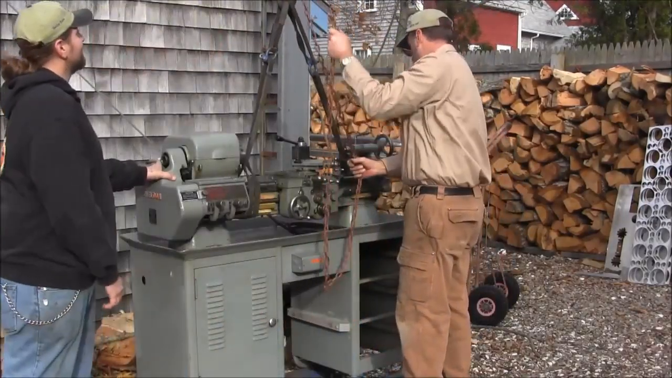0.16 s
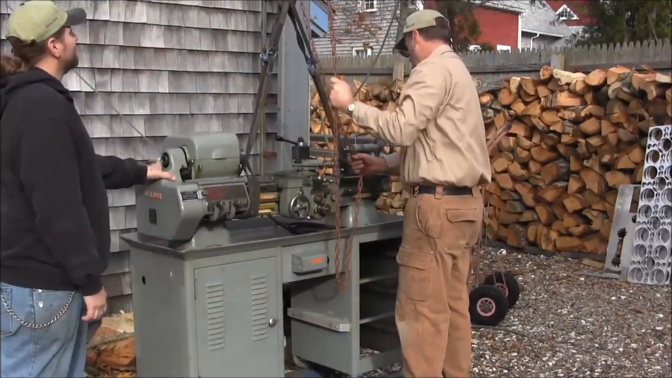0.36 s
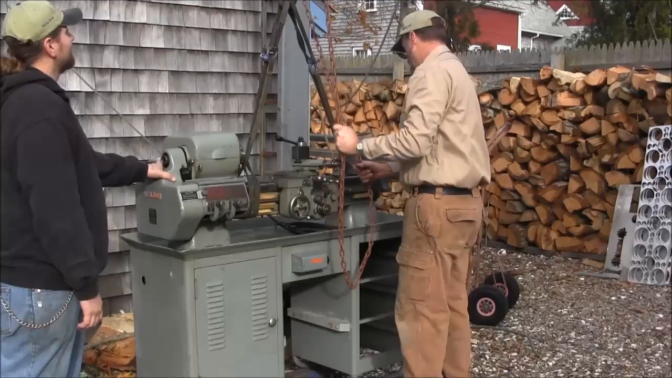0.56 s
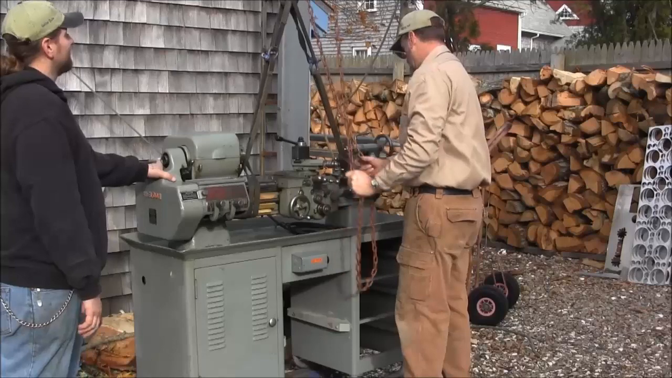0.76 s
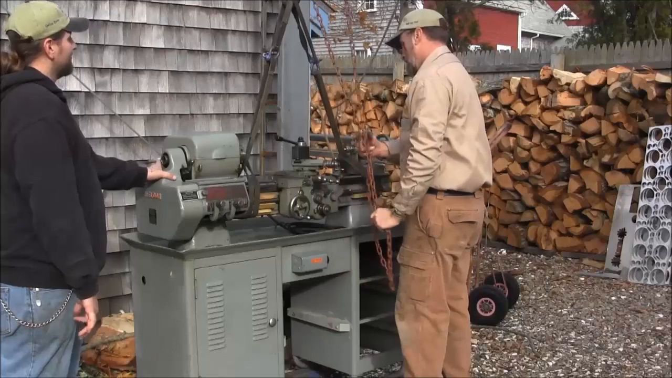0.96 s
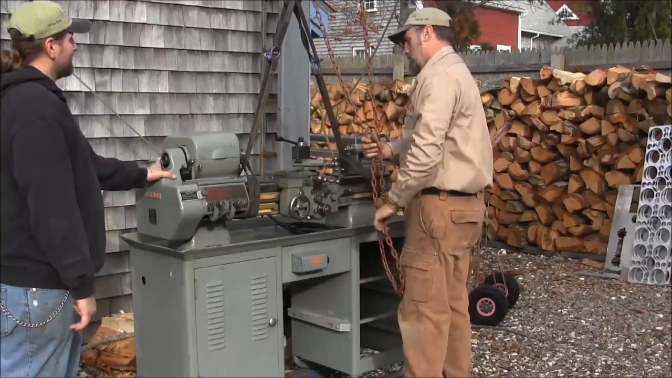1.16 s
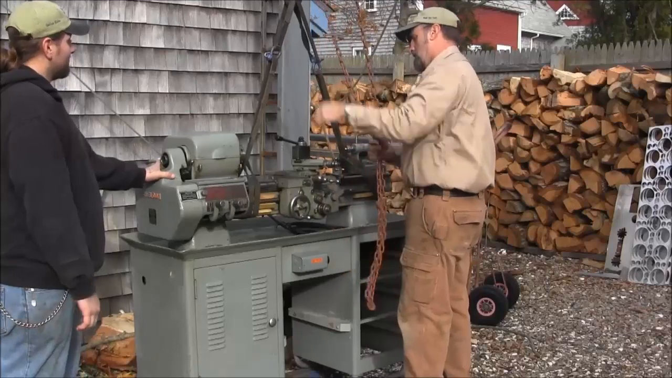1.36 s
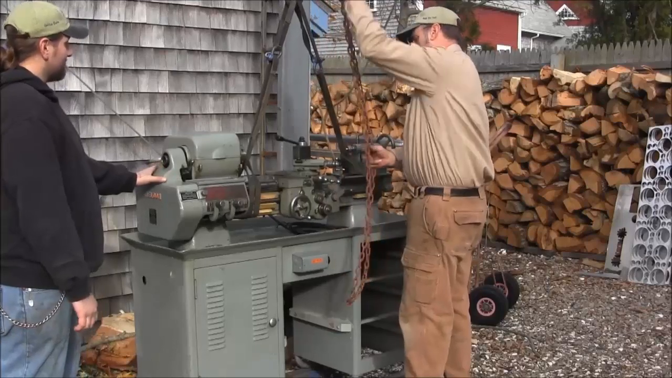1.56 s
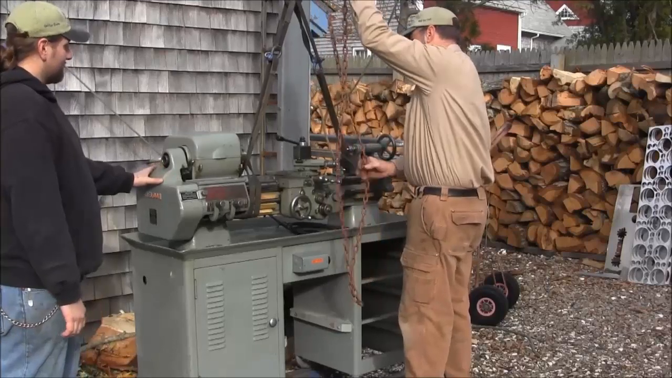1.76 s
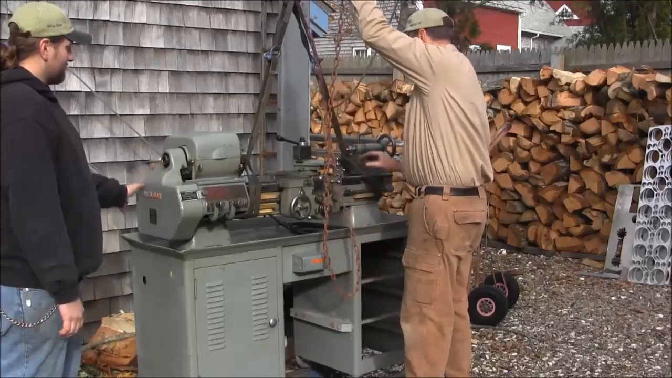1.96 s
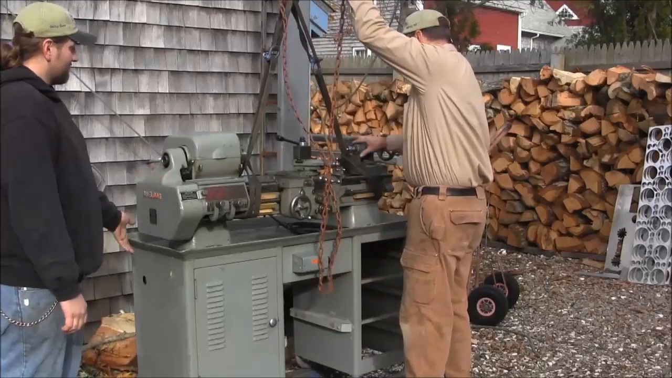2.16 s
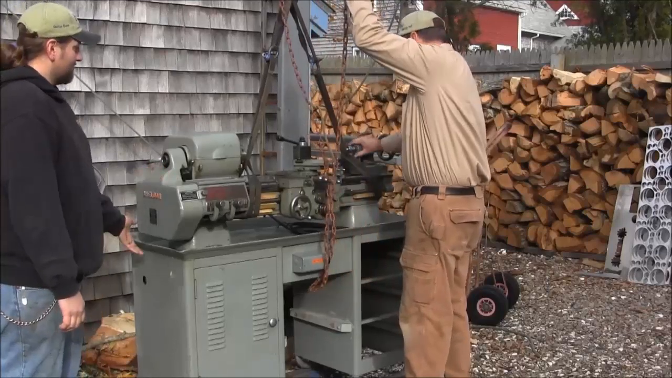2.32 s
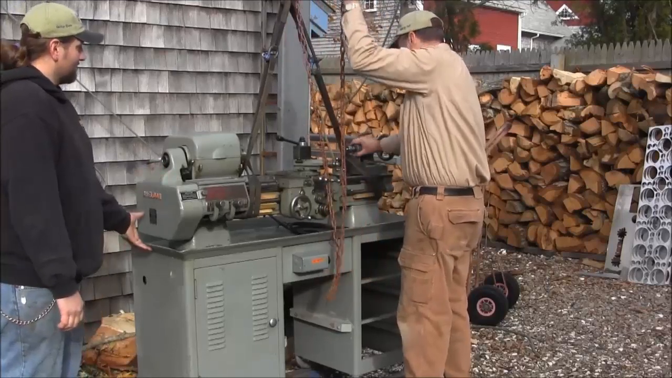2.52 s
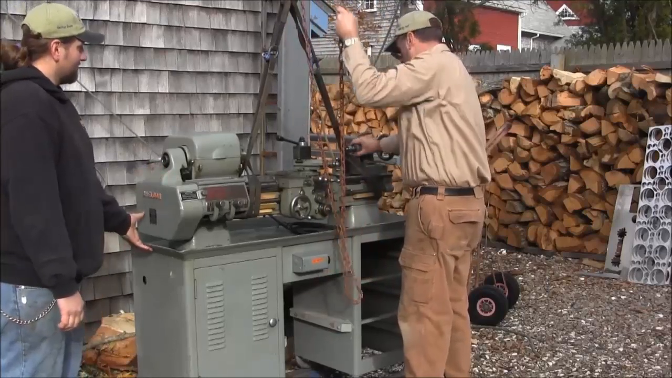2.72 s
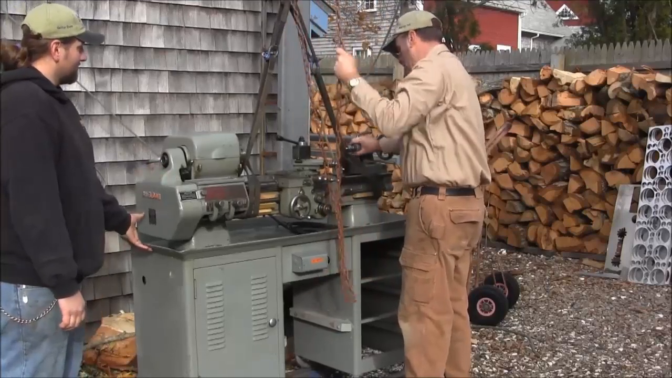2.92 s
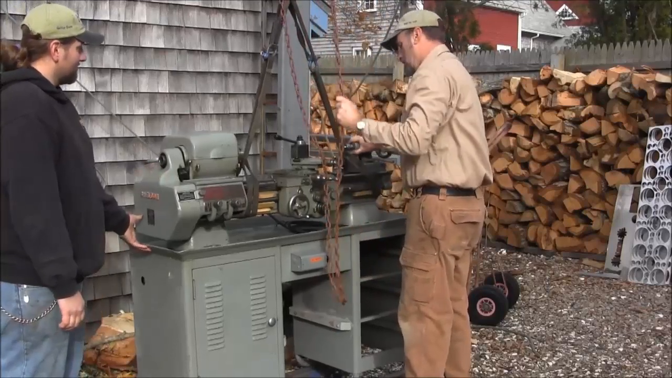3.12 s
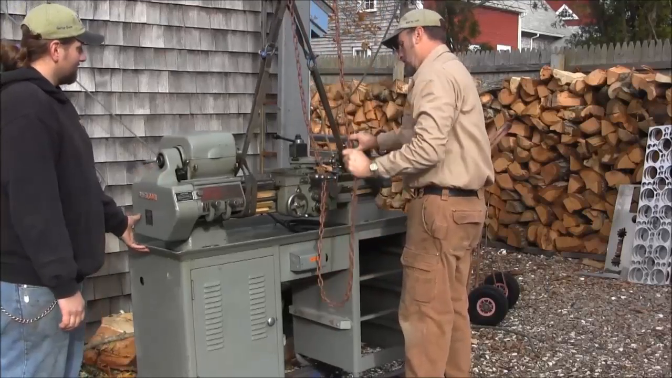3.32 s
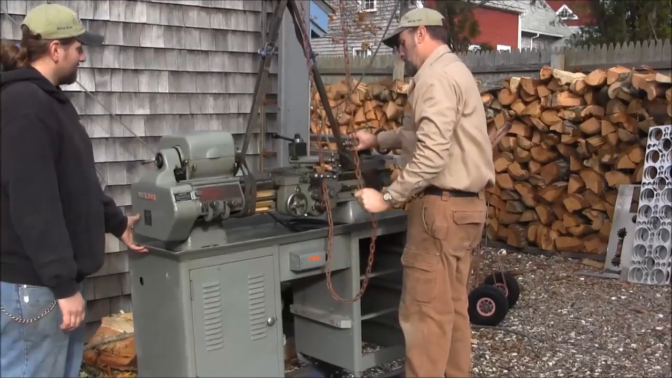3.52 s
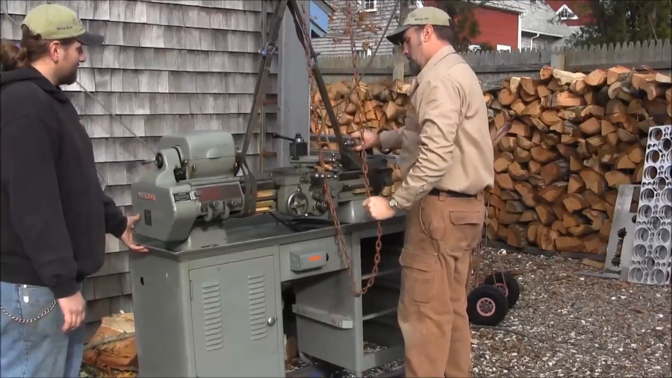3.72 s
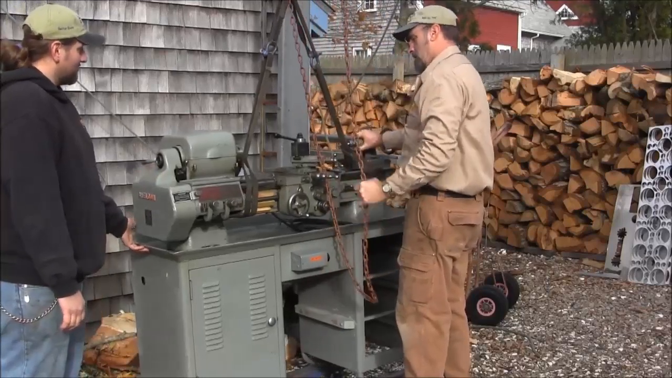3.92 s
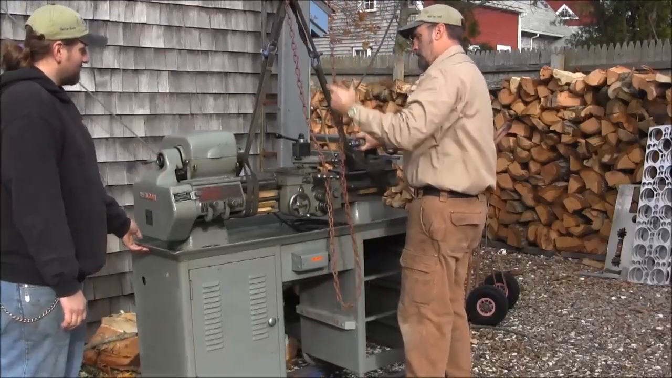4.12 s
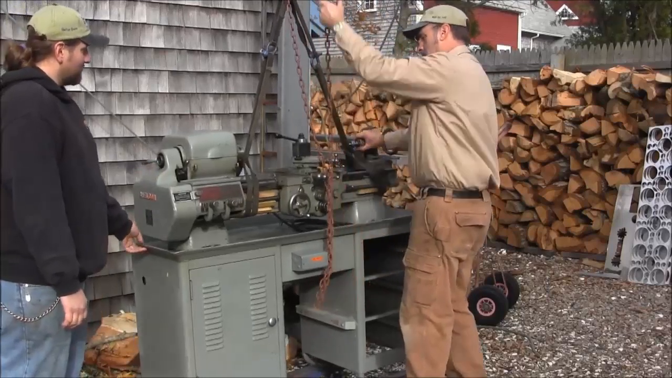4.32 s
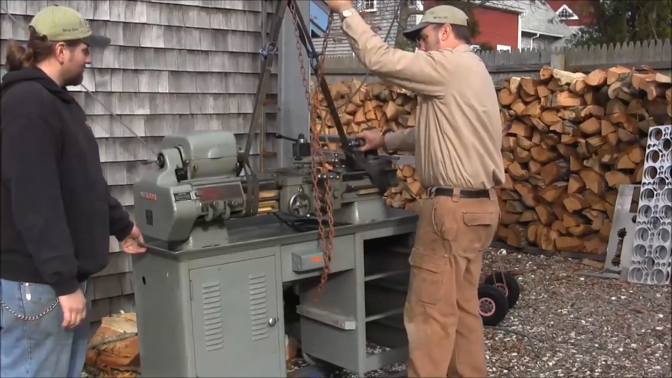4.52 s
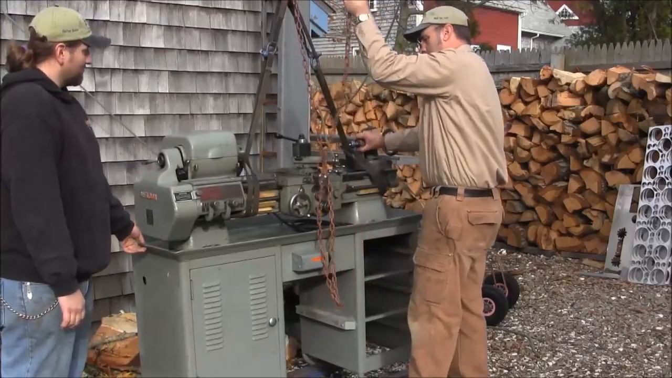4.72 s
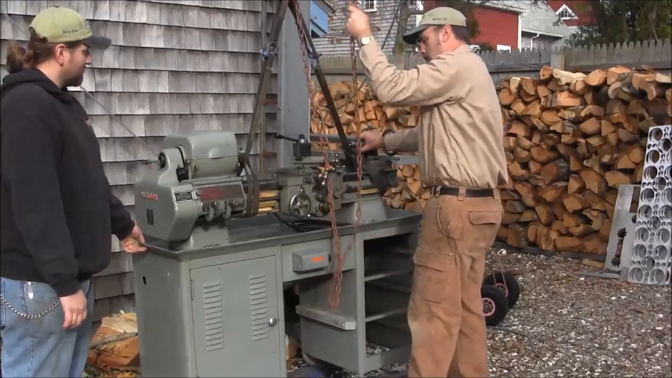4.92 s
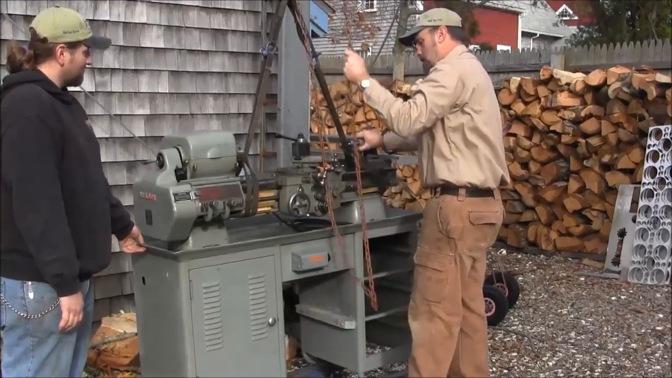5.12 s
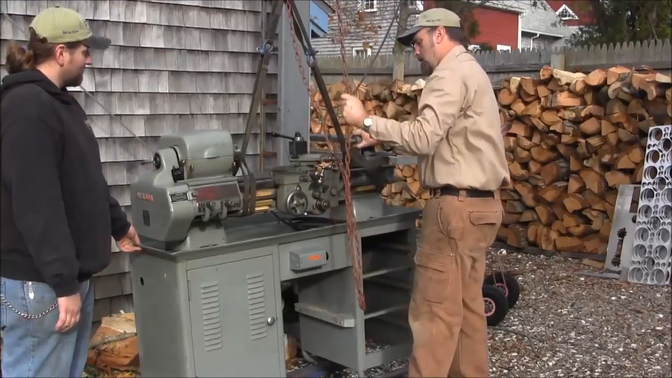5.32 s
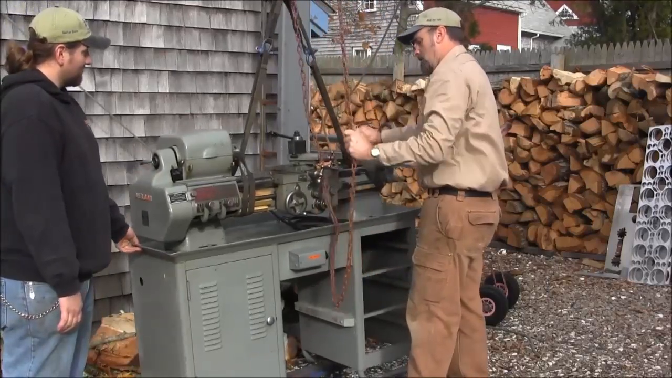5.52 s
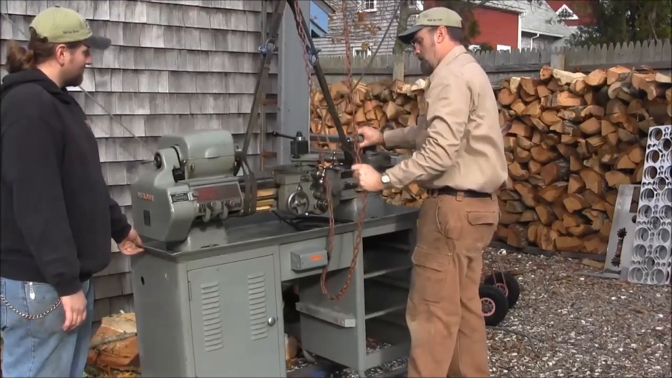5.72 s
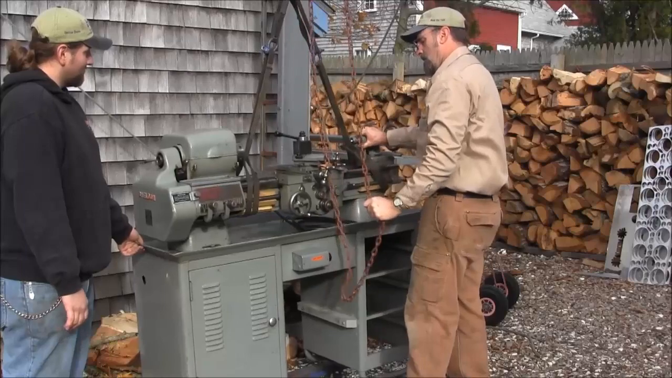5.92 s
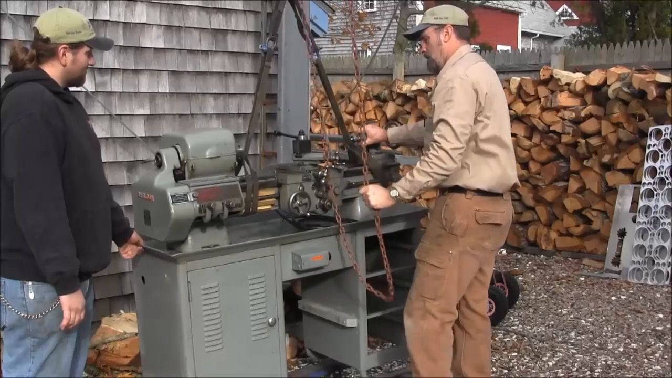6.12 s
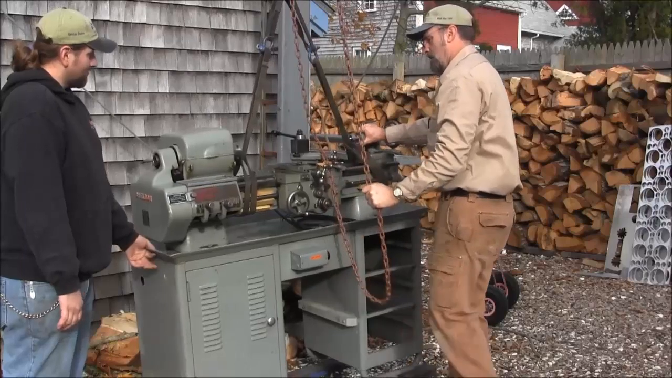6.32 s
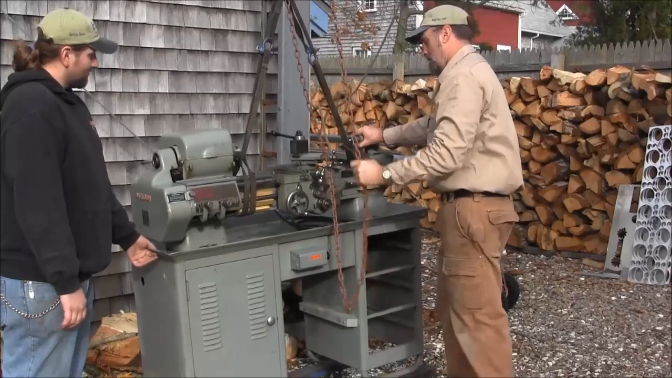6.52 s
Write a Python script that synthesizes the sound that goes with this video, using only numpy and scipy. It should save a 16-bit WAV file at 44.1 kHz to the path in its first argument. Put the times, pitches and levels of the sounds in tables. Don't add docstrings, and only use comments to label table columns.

```python
import sys
import numpy as np
from scipy import signal
from scipy.fft import rfft, irfft, next_fast_len
from scipy.io import wavfile
from scipy.ndimage import uniform_filter1d, map_coordinates

SR = 44100
rng = np.random.default_rng(int(sys.argv[2]) if len(sys.argv) > 2 else 0)


def transcribe(u):
    v = np.clip(np.atleast_2d(u).T, -1, 1)
    q = np.round(v * 32767).astype(np.int16)
    wavfile.write(sys.argv[1], SR, q)


def undo_db(level):
    steps = np.asarray(level, float) / 20
    return 10 ** steps


N = 294147
BLOW = 6144

# pitch_hz, level_db (per Hz)
ROAD_TONE = [(15, -66), (25, -1), (58, -15), (80, 1.5), (256, -1.5), (363, -1), (394, 3.5), (451, -1.5),
             (754, 0.5), (1440, -2.5), (2050, -12), (14800, -43), (16000, -48)]
# pitch_hz, likeness (1 = the same)
ROAD_LIKENESS = [(30, 0.93), (70, .85), (130, 0.96), (240, 0.91), (950, 0.88), (3770, 0.78), (15000, 0.65)]
# pitch_hz, fade_s (to fall 60 dB)
WALL_FADE = [(200, 0.18), (2000, 0.032), (10000, 0.2)]

# start_s, clack_db, ring_db
PULL_1 = [(0.0094, -6, -44), (0.0537, -4.5, -24), (0.0898, -4, -25), (0.1246, -5, -34), (0.1579, -6.5, -30),
          (0.1917, -8, -23), (0.2263, -7.5, -33), (0.2599, -6.5, -23.5), (0.2939, -11, -22),
          (0.325, -9.5, -33), (0.3583, -9.5, -27), (0.392, -8, -30), (0.4248, -12.5, -28),
          (0.4577, -9.5, -31), (0.4918, -13, -32), (0.5258, -10, -28), (0.5618, -9.5, -24.5),
          (0.5983, -11.5, -34), (0.635, -8.5, -29.5), (0.6721, -9.5, -29), (0.7073, -9, -29),
          (0.7455, -8, -28.5), (0.7807, -10, -22), (0.8151, -9.5, -25), (0.8477, -8.5, -32),
          (0.8804, -8, -35), (0.9156, -6.5, -28), (0.9493, -9.5, -28), (0.9869, -8, -28),
          (1.0287, -8, -32.5), (1.087, -10.5, -32)]
PULL_2 = [(2.6038, -13, -26), (2.6569, -10, -29.5), (2.706, -12.5, -28.5), (2.7523, -10.5, -37),
          (2.796, -15, -31), (2.839, -11, -31), (2.878, -9, -25), (2.9175, -10.5, -27), (2.958, -10, -30),
          (2.9991, -20, -32), (3.035, -11.5, -27), (3.073, -24, -33), (3.1095, -9.5, -33),
          (3.146, -8.5, -28), (3.18, -7.5, -30), (3.2128, -13, -21.5), (3.246, -8, -32),
          (3.2763, -8.5, -25), (3.3083, -9.5, -34), (3.3406, -14, -23), (3.3717, -12, -28),
          (3.4038, -13, -28.5), (3.4384, -12.5, -26.5), (3.474, -9, -27.5), (3.5091, -7, -30),
          (3.5473, -10.5, -34), (3.588, -12, -28), (3.6359, -14, -23), (3.6927, -20.5, -28.5)]
PULL_3 = [(4.8642, -11, -29), (4.9536, -10.5, -21.5), (5.007, -8.5, -29), (5.0528, -9.5, -27.5),
          (5.0928, -18, -35), (5.1342, -16.5, -36), (5.17, -21, -29), (5.2038, -11.5, -35),
          (5.241, -13.5, -23.5), (5.276, -12, -26), (5.3131, -10.5, -32), (5.3492, -13.5, -29.5),
          (5.3878, -11, -31), (5.431, -13, -31), (5.4787, -12.5, -28), (5.5274, -13, -29),
          (5.5753, -11, -30), (5.6222, -11.5, -29.5), (5.669, -8, -47), (5.717, -9.5, -33),
          (5.77, -12, -26.5), (5.8201, -11.5, -32), (5.8681, -10.5, -29.5), (5.9112, -11.5, -28.5),
          (5.9536, -13.5, -38), (5.995, -19, -32)]

# pitch_hz, width_hz, level_db
HOUSING = [(600, 250, -2), (1450, 120, 9.5), (1088, 56, 3), (1300, 300, 11.5), (2330, 520, 3),
           (2340, 20, 14), (2850, 48, 6), (3390, 290, 1.5), (3470, 150, 6), (4025, 280, 5.5), (4540, 94, 2),
           (4930, 71, 6.5), (5020, 40, -1), (5670, 84, 0.5)]
COVER = [(2295, 30, -2), (2350, 22, 0), (2410, 30, -2), (4100, 90, 0), (4880, 45, -3), (5040, 45, -5)]
PAWL = [(8300, 31, 7), (8586, 110, 4.5), (8745, 102, 12.5), (9900, 150, -25)]
SPINDLE = [(12600, 110, 1), (13100, 58, 3), (13000, 64, -4)]
TOOTH = [(4070, 1190, -10), (2440, 550, -9)]
PANEL = [(676, 42, 5), (856, 9.7, 7.5), (963, 110, 3), (1300, 160, 1.5), (1484, 130, 1.5), (1596, 16, 4.5),
         (1752, 24, 4), (1910, 12, 10), (2110, 140, -0.5), (2370, 280, 3), (2650, 410, -5.5), (2860, 16, 3),
         (1140, 6.5, -7), (560, 290, -1)]
PANEL_HIGH = [(3450, 1600, -21)]
BOX = [(38.7, 5, -4), (184, 27, -6), (263, 140, -13), (310.3, 12.7, 9), (461.3, 15.6, 5.5)]
LINKS = [(3300, 45, 4), (3600, 570, 47.5), (4300, 1900, -29), (4680, 790, 44), (4750, 170, -4.5),
         (6300, 170, -6), (6750, 600, -107), (9130, 350, -9.5), (12300, 610, -24)]
LOOP = [(1884, 17, -5.5), (2790, 53, 17), (3370, 21, -4.5), (3860, 35, 4), (4790, 16, -13),
        (8350, 100, -28)]

# time_s, level_db
RUBBING = [(0, -23), (.95, -35.5), (1.09, -35.5), (1.9, -77), (1.99, -34), (2.5, -28), (3.05, -21),
           (3.45, -21), (3.62, -22.5), (3.75, -31.5), (4.32, -67), (4.85, -36), (5.1, -27.5), (5.5, -32),
           (5.75, -22.5), (5.93, -18.5), (6.04, -35.5), (6.67, -44)]
# middle_s, box_db, hum_db (one low, narrow note), length_s (to each side)
SHUDDERS = [
    (0.375, -31.5, -58, 0.031),
    (1.413, -51, -47.5, 0.2),
    (1.615, -48, -42.5, 0.14),
    (3.046, -51, -49, 0.54),
    (3.362, -63, -34, 0.056),
    (3.743, -54, -66, 0.44),
    (4.652, -52.5, -63, 0.33),
    (5.194, -36, -45, 0.13),
    (5.773, -49, -31, 0.074),
    (6.227, -45, -59, 0.1),
]
# start_s, level_db, pitch_hz
STRIKES = [(0.0162, -1, 2620), (0.2626, -12, 2020), (0.525, -22, 2540), (0.7468, -3, 4390),
           (0.8561, -12, 2070), (0.8886, -13, 4870), (0.9512, -5, 2630), (0.9943, -7, 3880),
           (1.34, -20, 5730), (1.3802, -21, 5810), (1.4025, -19, 5600), (1.8604, -23, 2330),
           (2.0674, -27, 3830), (2.1173, -8, 1940), (2.1239, -13, 2760), (2.1451, -7, 3320),
           (2.5394, -14, 1640), (2.693, -24, 2710), (2.7485, -17, 5380), (2.7654, -12, 1850),
           (2.8457, -13, 1680), (2.918, -12, 3660), (3.1303, -11, 1980), (3.5173, -7, 1770),
           (3.6927, -14, 4480), (3.7176, -16, 2450), (4.272, -14, 4050), (4.509, -18, 1640),
           (5.0278, -11, 1550), (5.0577, -5, 3270), (5.0939, 0.5, 4010), (5.1547, -15, 4050),
           (5.162, -8, 1510), (5.171, -12, 1510), (5.279, -8, 3660), (5.5955, -11, 4260),
           (5.623, -17, 2070), (5.729, -11, 5250), (5.9, -12, 2200), (6.1706, -23, 1680),
           (6.1947, -12, 4260), (6.4865, -24, 1160)]
# start_s, level_db, clatter_s, pitch_hz, bright_db
SLAPS = [(0.308, -0.5, 0.018, 2050, -7), (1.233, -13.5, 0.025, 544, -12), (1.258, -31, 0.027, 2600, -6),
         (1.632, -38, 0.06, 1140, 1), (1.69, -25, 0.061, 1260, -16), (1.805, -16.5, 0.035, 2580, -22),
         (1.964, -19, 0.065, 1240, -2), (1.99, -29.5, 0.033, 1270, 4.5), (2.027, -24, 0.11, 1060, -5),
         (2.065, -20, 0.017, 766, 0), (2.078, -15.5, 0.0063, 1300, -13), (2.111, -0.5, 0.019, 2160, -3.5),
         (2.146, -5.5, 0.027, 2890, -10.5), (2.172, -9, 0.015, 900, -21), (2.205, -10, 0.02, 2440, -8),
         (2.266, -4, 0.032, 1670, -0.5), (2.334, -15.5, 0.016, 1010, -12), (2.365, -24, 0.028, 1500, 1),
         (2.386, -31, 0.036, 1240, -32), (2.441, -13.5, 0.0081, 1840, -39), (2.467, -19, 0.04, 3000, 2),
         (2.539, -6, 0.047, 1770, -9), (2.59, -0.5, 0.021, 2070, -10.5), (2.75, -20, 0.045, 1570, -6),
           (2.763, -1.5, 0.026, 2050, -8.5), (2.872, -6.5, 0.023, 2870, -3.5), (2.938, -3, 0.027, 2110, -1),
           (2.998, -1.5, 0.025, 2650, -8.5), (3.063, -2.5, 0.022, 2650, -8), (3.129, -3.5, 0.028, 1910, -9),
           (2.991, -10, 0.021, 2000, -6), (3.16, -8, 0.03, 1880, -7), (3.188, -6, 0.034, 1500, -13),
           (3.39, -5.5, 0.017, 1770, -20), (3.7, -14.5, 0.026, 2260, -5), (3.218, -3, 0.05, 1910, -10),
           (3.33, -1, 0.055, 1300, -11.5), (3.447, -2, 0.031, 1580, -9), (3.519, 1, 0.016, 1760, -16),
           (3.6, -3, 0.026, 1910, -5), (3.848, -14.5, 0.091, 1110, -14), (4.271, -15, 0.02, 634, -10),
           (4.379, -10.5, 0.021, 755, -10.5), (4.41, -28, 0.093, 1470, -8), (4.487, -18.5, 0.005, 900, -14),
         (4.591, -19.5, 0.028, 1630, -31), (4.512, -21.5, 0.045, 1180, -27),
           (5.154, -10.5, 0.035, 1810, -6), (5.583, -17, 0.032, 1000, 6), (5.626, -19, 0.017, 1420, -3),
           (5.735, -6, 0.056, 1300, -12.5), (5.872, -14, 0.018, 1450, -12), (5.931, -10.5, 0.02, 1500, -11),
           (4.73, -21.5, 0.052, 950, -39), (4.801, -15.5, 0.018, 1500, -14.5),
           (5.028, -2, 0.026, 1940, -6.5), (5.095, -6.5, 0.023, 910, -5), (5.164, -3, 0.017, 1120, -10),
           (5.541, -7.5, 0.034, 1950, 0), (5.595, -6, 0.026, 1940, -6), (5.669, -2.5, 0.075, 1570, -10.5),
           (5.761, -8.5, 0.012, 557, -17), (5.845, -4, 0.033, 1800, -12.5),
           (5.897, -10.5, 0.03, 1910, -10.5), (6.001, -11.5, 0.086, 2080, -11.5),
           (6.136, -24, 0.11, 1720, -8.5), (6.173, -12, 0.057, 1850, -9), (6.196, -5, 0.019, 2790, -18),
           (6.405, -18.5, 0.021, 830, -8)]
# start_s, level_db
THUMPS = [(0.306, -14), (1.235, -22.5), (1.263, -21), (2.205, -23), (2.765, -45), (3.004, -16),
          (3.063, -15), (3.128, -22), (3.329, -44), (3.449, -26), (3.518, -31), (3.843, -22),
          (5.023, -13.5), (5.162, -44), (5.594, -13.5), (5.775, -30), (6.172, -16), (6.198, -20),
          (6.401, -30)]
# start_s, level_db
TICKS = [(1.3124, -37), (1.34, -27.5), (1.352, -29), (1.3794, -27.5), (1.4012, -26), (1.421, -35),
         (1.544, -38), (1.5663, -35), (1.797, -34), (1.358, -41), (1.532, -46), (1.8597, -47), (2.418, -34),
         (2.378, -33), (1.874, -37), (2.0214, -36), (4.258, -32), (4.3305, -32), (4.411, -46), (4.435, -41),
         (4.563, -39), (4.663, -43), (4.941, -29), (5.527, -33), (4.488, -40), (4.515, -40), (4.635, -40),
         (6.169, -31), (4.788, -31), (4.3593, -22), (4.4493, -36), (6.323, -27.5), (6.388, -27),
         (6.488, -44), (6.52, -31), (6.126, -37)]
# start_s, level_db, clatter_s,
# pitch_hz
CLANKS = [(1.628, -32.5, 0.31, 1140), (1.804, -26, 0.022, 2910), (1.964, -25.5, 0.17, 1250),
          (1.976, -27, 0.3, 634), (1.992, -23.5, 0.14, 1260), (2.028, -32, 0.12, 1104),
          (2.174, -25.5, 0.055, 687), (2.333, -30, 0.074, 1010), (2.386, -30.5, 0.042, 1280),
          (2.467, -32, 0.019, 3600), (3.001, -15.5, 0.08, 2650), (3.328, -24, 0.038, 1300),
          (5.028, -19.5, 0.22, 856), (5.163, -22, 0.053, 868), (5.17, -26.5, 0.078, 618),
          (5.54, -15.5, 0.04, 1910), (1.09, -26.5, 0.2, 2350), (1.09, -33, 0.19, 4740),
          (1.09, -28, .07, 13050), (1.632, -48, 0.092, 8100), (1.695, -50, 0.11, 8100),
          (1.258, -58, .04, 7200), (1.811, -50, 0.045, 4740), (1.812, -39, .12, 3030),
          (2.269, -14.5, 0.02, 4400), (4.866, -29, 0.072, 13050), (5.866, -26, .05, 1450),
          (5.675, -25, 0.055, 886), (5.725, -22.5, 0.046, 647), (5.75, -22.5, 0.035, 515),
          (5.773, -23.5, 0.096, 386), (5.786, -39, 0.035, 200), (5.846, -27.5, 0.085, 950),
          (6.197, -34, 0.046, 2850), (4.379, -28, 0.021, 2470), (4.592, -31.5, 0.047, 1625),
          (4.381, -25.5, 0.045, 1147), (5.1, -23, 0.15, 914), (0.312, -15.5, .03, 1920),
          (2.39, -37, 0.16, 478)]
# start_s, level_db
JINGLES = [
    (4.6, -35),
    (3.4, -31),
    (3.885, -39.5),
    (6.45, -39.5),
    (6.006, -31),
]


def unit(x):
    return x / np.sqrt(np.mean(x ** 2) + 1e-20)


def along(points, hz):
    pitch, value = np.transpose(points)
    return np.interp(np.log(hz + 1), np.log(pitch + 1), value)


def curve(rows):
    s, value = np.transpose(rows)
    return np.interp(np.arange(N) / SR, s, value)


def modes(body, hz, blur=1):
    pitch, width, db = np.transpose(body)[:, :, None]
    damping = 1j * hz * width * blur
    return undo_db(db) * damping / (pitch ** 2 - hz ** 2 + damping)


def signs(body):
    return (-1) ** np.arange(len(body))


def filtered(x, response):
    size = next_fast_len(N + BLOW)
    return irfft(rfft(x, size) * response(np.fft.rfftfreq(size, 1 / SR)), size)[..., :N]


def spiky(shape, spread_db):
    return rng.standard_normal(shape) * undo_db(spread_db * np.minimum(rng.exponential(size=shape), 3.5))


def placed(s, sounds):
    where = np.round(s * SR).astype(int)[:, None] + np.arange(sounds.shape[1])
    return np.bincount(where.ravel(), sounds.ravel(), N + BLOW)[:N]


def struck(s, db, fade_s, body, spread_db, scatter_db, crack_db, first_db, lean_db=0):
    t = np.arange(BLOW // 2) / SR
    bounces = spiky((len(s), len(t)), spread_db)
    bounces *= undo_db(first_db * np.exp(-t / 0.00036))
    bounces *= undo_db(-60 * t / np.clip(np.reshape(fade_s, (-1, 1)), 0.003, 0.2))

    strength = undo_db(lean_db + scatter_db * rng.standard_normal((len(s), len(body)))) * signs(body)
    hz = np.fft.rfftfreq(BLOW, 1 / SR)
    ring = strength @ modes(body, hz)
    crack = undo_db(crack_db) * np.abs(strength) @ modes(body, hz, blur=2.59)
    hits = irfft(rfft(bounces, BLOW) * (ring + crack), BLOW)

    loudest = uniform_filter1d(hits ** 2, size=200, axis=1).max(axis=1, keepdims=True)
    return placed(s, hits * undo_db(db)[:, None] / np.sqrt(loudest))


def traffic():
    noise = signal.stft(rng.standard_normal((2, N)), nperseg=512)[2]
    patches = uniform_filter1d(rng.standard_normal(noise.shape[1:]), size=5, axis=0)
    patches = uniform_filter1d(patches, size=12, axis=1)
    pair = signal.istft(noise * undo_db(1.6 * unit(patches)), nperseg=512)[1][:, :N]

    def tone(hz):
        angle = np.arccos(np.clip(along(ROAD_LIKENESS, hz), -1, 1)) / 2
        return undo_db(along(ROAD_TONE, hz)) * np.array([np.cos(angle), np.sin(angle)])

    mid, side = filtered(pair, tone)
    return undo_db(-41) * unit(np.array([mid + side, mid - side]))


def wheel():
    speed = np.zeros(N)
    for pull in (PULL_1, PULL_2, PULL_3):
        s = np.transpose(pull)[0]
        speed += np.gradient(np.interp(np.arange(N) / SR, s, np.arange(len(s))))
    usual_teeth_per_s = 38.2
    speed = uniform_filter1d(speed * SR / usual_teeth_per_s, size=2000)
    return undo_db(-31) * np.abs(speed) ** 2.33


def tremor(whirr):
    top_hz = 110
    noise = rng.standard_normal((2, N))
    both, own = unit(filtered(noise, lambda hz: 1j * hz / (1 + 1j * hz / top_hz) ** 4))
    level = undo_db(-40.5 + 0.85 * curve(RUBBING)) + undo_db(-24) * whirr
    return level * np.array([both + 0.4 * own, 1.4 * both - 0.53 * own])


def rattle(whirr):
    lumps_hz, lumps_db = 45, 3.5
    knots = rng.standard_normal(int(N * lumps_hz / SR) + 4)
    lumps = map_coordinates(knots, [np.arange(N) * lumps_hz / SR])
    contacts = spiky(N, spread_db=3) * undo_db(lumps_db * lumps)

    def sound(body):
        return unit(filtered(contacts, lambda hz: signs(body) @ modes(body, hz)))

    middle_s, box_db, hum_db, length_s = np.transpose(SHUDDERS)[:, :, None]
    phase = np.clip((np.arange(N) / SR - middle_s) / length_s, -1, 1)
    swell = np.cos(np.pi / 2 * phase) ** 2
    rub = undo_db(curve(RUBBING) - 8)

    panel = rub * sound(PANEL + PANEL_HIGH)
    metal = (whirr + undo_db(-12) * rub) * sound(HOUSING[5:] + LINKS[4:])
    box = (undo_db(-8.5) * rub + (undo_db(box_db) * swell).sum(axis=0)) * sound(BOX)
    hum = (undo_db(-62) + (undo_db(hum_db) * swell).sum(axis=0)) * sound([(178.3, 12, 0)])
    return panel + metal + box + hum


def ratchet(s, db, ring_db):
    tick_luck, high_luck = rng.standard_normal((2, len(s)))
    knock = struck(s, db - 12, 0.0082, TOOTH, spread_db=-1.8, scatter_db=1.5, crack_db=-68, first_db=-20)
    clang = struck(s, db - 13, 0.13, HOUSING, spread_db=4.5, scatter_db=3, crack_db=-9.5, first_db=0)
    tick = struck(s, db - 24.5 + 1.5 * tick_luck, 0.07, LINKS[4:],
                  spread_db=5, scatter_db=2.5, crack_db=-4, first_db=4)
    cover = struck(s, db - 19, 0.012, COVER, spread_db=3, scatter_db=4, crack_db=-20, first_db=3)
    ring = struck(s + 0.0011, ring_db + 0.5, 0.041, PAWL,
                  spread_db=4, scatter_db=0.5, crack_db=-17, first_db=9)
    high = struck(s + 0.0012, db - 28 + 2 * high_luck, 0.04, SPINDLE,
                  spread_db=2, scatter_db=3, crack_db=-14, first_db=0)
    direct = knock + clang + cover + tick + ring + high
    bounce = np.pad(direct, (round(0.0055 * SR), 0))[:N]
    return direct + undo_db(-11.5) * bounce


def chirps(s, db):
    t = np.arange(512) / SR
    luck, phase = rng.standard_normal((2, len(s), 1))
    pitch_hz = 3980 * (1 + 0.04 * luck)
    rise = t / 0.0008
    swell = rise * np.exp(1 - rise)
    return placed(s, undo_db(db[:, None] - 6.5) * swell * np.sin(2 * np.pi * pitch_hz * t + phase))


def wall(x):
    delay_s = 0.004
    hz, t, noise = signal.stft(rng.standard_normal((2, SR // 3)), SR, nperseg=256)
    fade = undo_db(-60 * t / along(WALL_FADE, hz)[:, None])
    tail = signal.istft(noise * fade, SR, nperseg=256)[1]
    tail /= np.linalg.norm(tail[0])
    late = np.pad(x, (round(delay_s * SR), 0))
    return signal.fftconvolve(late[None], tail, axes=1)[:, :N]


def strikes():
    s, db, hz = np.transpose(STRIKES)
    cycles = hz[:, None] * np.arange(256) / SR
    fade_db = -20 * cycles / 2.8
    return placed(s, undo_db(db[:, None] - 0.5 + fade_db) * np.sin(2 * np.pi * cycles))


def slaps():
    s, db, clatter_s, pitch_hz, bright_db = np.array(SLAPS).T
    octaves = np.log2(np.transpose(PANEL)[0] / pitch_hz[:, None])
    lean_db = 13 * np.exp(-(octaves / 0.34) ** 2)
    panel = struck(s, db - 9.5, 6.6 * clatter_s, PANEL,
                   spread_db=4.5, scatter_db=3, crack_db=8.5, first_db=3, lean_db=lean_db)
    links = struck(s, db + bright_db - 7, 2.5 * clatter_s, LINKS,
                   spread_db=2, scatter_db=9, crack_db=-5, first_db=7)

    s, db = np.concatenate([[s, db - 39], np.transpose(THUMPS)], axis=1)
    boom = struck(s, db - 12.5, 0.43, BOX, spread_db=1.5, scatter_db=0.5, crack_db=27, first_db=7)

    s, db = np.transpose(TICKS)
    ticks = struck(s, db - 8, 0.03, LINKS, spread_db=4.5, scatter_db=5, crack_db=5, first_db=9)
    ticks = filtered(ticks, lambda hz: 1 / (1 + 1j * hz / 9000))
    steel = filtered(panel + boom, lambda hz: 1 / (1 + 1j * hz / 3500) ** 2)
    return steel + links + ticks


def clanks():
    s, db, clatter_s, hz = np.transpose(CLANKS)
    notes = np.transpose([hz, hz / 26, 0 * hz])
    own_db = 80 * np.eye(len(s))
    clank = struck(s, db, clatter_s, notes,
                   spread_db=7, scatter_db=2, crack_db=-4.5, first_db=2.5, lean_db=own_db)
    s, db = np.transpose(JINGLES)
    jingle = struck(s, db, 0.06, LOOP, spread_db=4.5, scatter_db=3, crack_db=-5, first_db=0)
    return clank + jingle


def scene():
    s, db, ring_db = np.concatenate([PULL_1, PULL_2, PULL_3]).T
    whirr = wheel()
    hoist = ratchet(s, db, ring_db) + chirps(s, db)
    cabinet = rattle(whirr) + strikes() + slaps() + clanks()
    near = hoist * undo_db([[0.2], [-0.2]]) + cabinet * undo_db([[0.4], [-0.4]])
    return traffic() + tremor(whirr) + near + undo_db(-11) * wall(hoist + cabinet)


def low_pass(x):
    return signal.sosfilt(signal.butter(12, 16810, fs=SR, output="sos"), x)


def record(dry):
    heard = filtered(dry, lambda hz: 1j * hz / (60 + 1j * hz) / np.sqrt(1 + (hz / 13500) ** 8))
    heard /= (1 + np.abs(heard / 0.8) ** 4) ** (1 / 4)
    heard = filtered(heard, lambda hz: (hz < 16700) / (1 + (hz / 15850) ** 80))
    return low_pass(heard)


dry = scene()
out = record(dry)
transcribe(out)
```